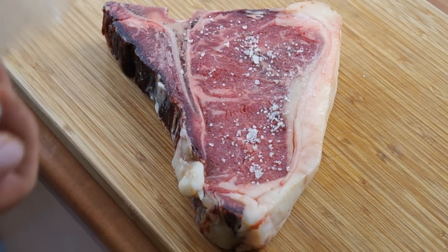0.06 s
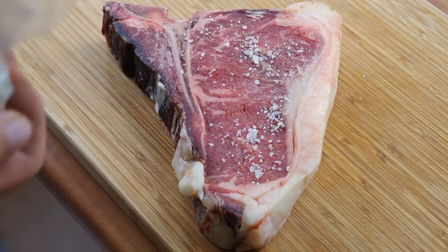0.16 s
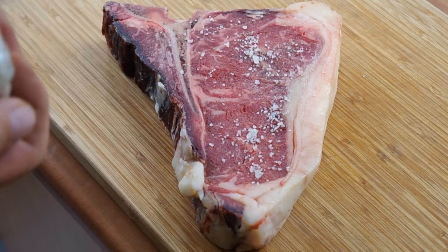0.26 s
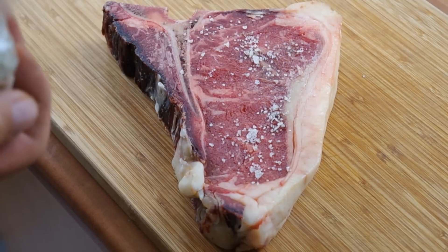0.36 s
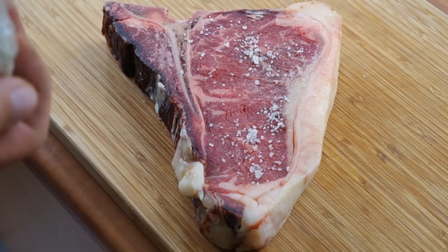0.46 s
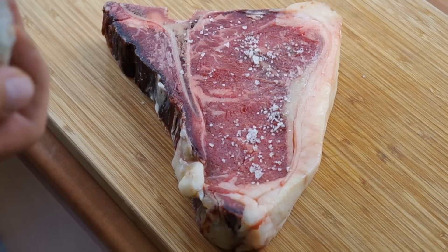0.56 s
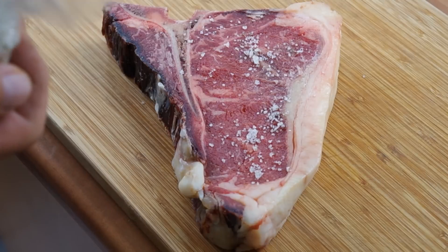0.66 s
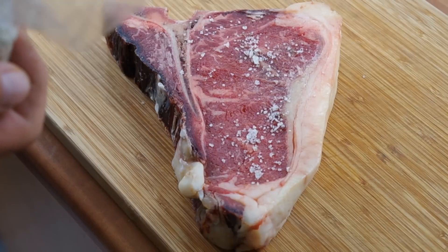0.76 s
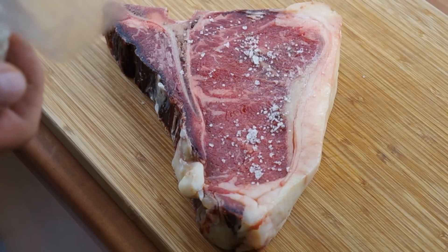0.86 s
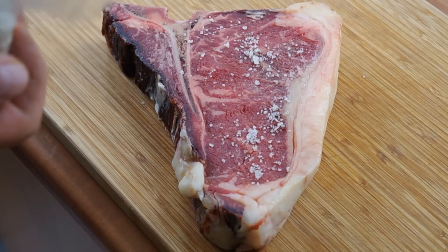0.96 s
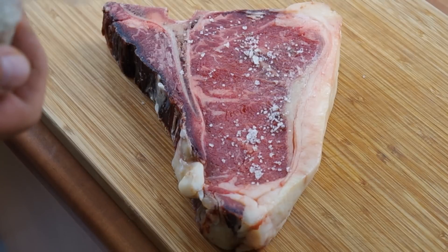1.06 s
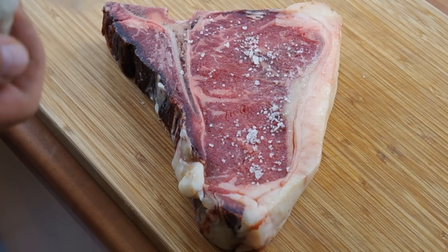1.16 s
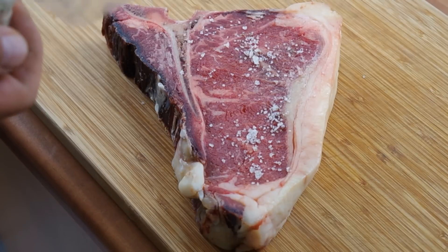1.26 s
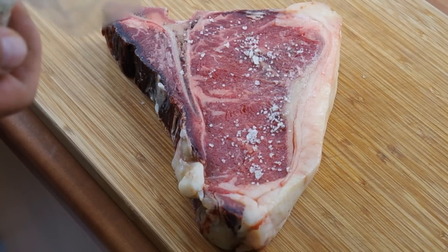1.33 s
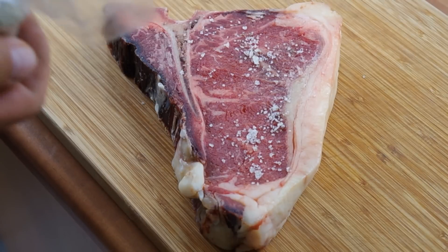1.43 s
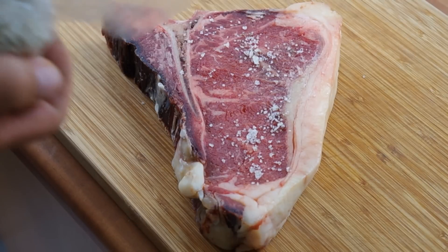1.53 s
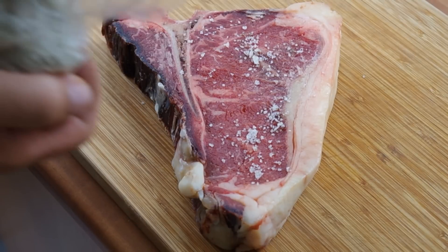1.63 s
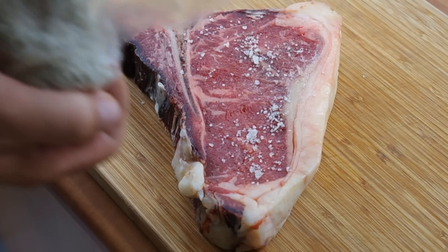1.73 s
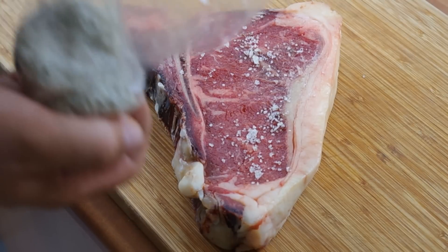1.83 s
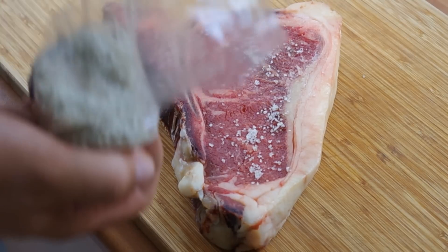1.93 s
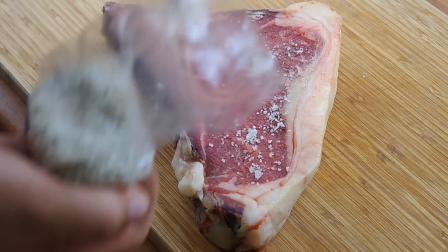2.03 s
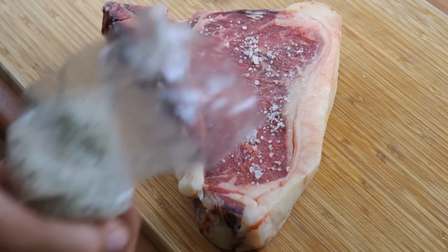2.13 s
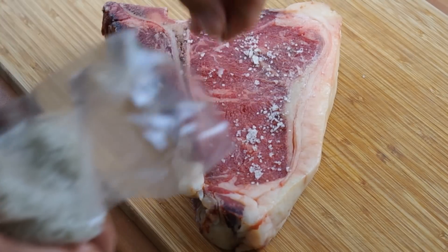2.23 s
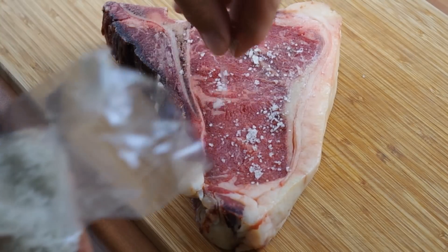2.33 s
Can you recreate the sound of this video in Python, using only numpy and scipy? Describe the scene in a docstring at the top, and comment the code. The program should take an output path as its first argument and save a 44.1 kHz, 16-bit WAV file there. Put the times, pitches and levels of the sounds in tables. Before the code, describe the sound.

A thin plastic bag of coarse salt is handled very close to the microphone: near silence, then bright snaps and crumples, densest before one second, then sparser crackles fading into faint hiss in a small live kitchen.

```python
"""A thin plastic bag of coarse salt is handled close by in a small, lively kitchen.
Creases snap as struck resonances; crumpling film, crackle and grinding crystals are filtered random clicks.
Flexing panels are decaying noise through resonances, and a shifting load is one filtered impulse.
Room echoes follow, over smooth filtered noise: a steady low rumble and a faint hiss of trickling salt
that swells in early, then holds nearly level."""
import sys
import numpy as np
from scipy import signal
from scipy.io import wavfile
from scipy.ndimage import uniform_filter1d

SR = 44100
rng = np.random.default_rng(int(sys.argv[2]) if len(sys.argv) > 2 else 0)


def output_pcm(signal):
    """Save a mono or channel-first signal as 16-bit PCM at the path in sys.argv[1].

    Samples are clipped to [-1, 1] before scaling.
    """
    pcm = np.clip(np.atleast_2d(signal).T, -1, 1) * 32767
    wavfile.write(sys.argv[1], SR, np.round(pcm).astype(np.int16))


N = 105840  # samples, 2.4 s


def snaps():
    """Impulse response: a crease's sudden release, a tick with a brief flutter, excites a broad resonance."""
    # Creases snapping through. Each row: start in seconds, rms level in dB before the common trim, pitch in Hz.
    snap_events = [(.1758, -30, 7400), (0.205, -41, 11000), (.2818, -17, 8500), (0.3106, -19, 7500),
                   (0.3235, -25, 11600), (0.3248, -16, 11600), (.357, -19.5, 9400), (.439, -30, 11700),
                   (.4705, -25, 11600), (0.5872, -24, 11500), (.5926, -23, 11400), (.611, -9.5, 11200),
                   (0.6122, -16, 7150), (0.686, -19, 11400), (0.7407, -15.5, 10200), (0.8102, -18, 12000),
                   (.829, -8.5, 11200), (0.831, -17, 12100), (0.8343, -10.5, 12000), (.866, -10, 11000),
                   (0.8814, -10.5, 8150), (0.8803, -15.5, 12200), (1.0675, -14, 12200),
                   (1.1365, -18.5, 11800), (1.1546, -19.5, 8400), (1.228, -28, 12000), (1.241, -12, 10300),
                   (1.2453, -17, 12000), (1.3272, -23, 10800), (1.3655, -24.5, 11300), (1.3985, -16, 11500),
                   (1.402, -16.5, 11500), (1.4925, -26, 12400), (1.5195, -23, 12300),
                   (1.5966, -19.5, 13300), (1.6303, -17.5, 8300), (1.761, -12, 12600), (1.7938, -29, 10100),
                   (1.8175, -25, 10600), (2.1605, -27, 10900)]
    # Spectrum shared by all snaps. Each row: frequency in Hz, relative gain in dB.
    snap_spectrum = [(100, -15), (700, 9.5), (5000, 4), (14500, 1), (16000, -1)]
    width_hz, flutter_s, flutter_db, trim_db = 3140, .0007, -9.5, -14.5
    out = np.zeros(N)
    t = np.arange(512) / SR
    noises = rng.standard_normal((len(snap_events), len(t)))
    for (start, db, hz), noise in zip(snap_events, noises):
        tick = t == 0
        flutter = amp(flutter_db) * noise * np.exp(-t / flutter_s)
        resonance = ring(tick + flutter, hz, width_hz)
        add(out, start, amp(db) * unit(colour(resonance, snap_spectrum)))
    return amp(trim_db) * out


def crumples():
    """Shot noise: dense tiny folds, whose bursts add in power, swell and die away exponentially."""
    # Bursts of folding film. Each row: peak time, rise time and fall time in seconds, peak level in dB.
    bursts = [(0.323, 0.0028, 0.022, -24), (0.614, 0.0045, 0.01, -19.5), (0.742, 0.0065, 0.0052, -21),
              (.772, 0.013, 0.0057, -27), (.832, 0.0056, 0.079, -35.5), (0.872, 0.0072, 0.022, -26.5),
              (1.066, 0.0043, 0.014, -35), (1.154, 0.023, 0.015, -33), (1.407, 0.0046, 0.017, -36),
              (1.498, 0.003, 0.022, -34.5), (1.636, 0.013, 0.0071, -32.5), (1.799, 0.004, 0.019, -29.5),
              (1.895, 0.016, 0.031, -33), (2.162, .002, 0.02, -41), (1.942, 0.011, 0.015, -24.5)]
    # Spectrum of the folds. Each row: frequency in Hz, relative gain in dB.
    fold_spectrum = [(100, -23), (400, -14.5), (1000, -14.5), (2000, -8), (5000, -6), (11500, 2),
                     (14500, 0.5), (16000, -34)]
    t = np.arange(N) / SR
    power = np.zeros(N)
    for peak, rise, fall, db in bursts:
        decay = np.maximum((peak - t) / rise, (t - peak) / fall)
        power += (amp(db) * np.exp(-decay)) ** 2
    folds = grains(per_s=9000, spread_db=4.0)
    return np.sqrt(power) * unit(colour(folds, fold_spectrum))


def crackle():
    """Modulated shot noise: fine ticks of film and crystals come in clumps of varying spectrum."""
    # Strength of the crackle. Each row: time in seconds, rms level in dB.
    crackle_level = [(0, -59.5), (.1, -66), (.165, -62), (.19, -40), (.36, -41.5), (.47, -45.5),
                     (.57, -57.5), (.64, -34.5), (.88, -35.5), (1.03, -45), (1.1, -39.5), (1.21, -54),
                     (1.26, -34), (1.37, -50), (1.42, -44.5), (1.58, -49.5), (1.66, -40.5), (2.03, -54.5),
                     (2.4, -57.5)]
    # Spectrum of the ticks. Each row: frequency in Hz, relative gain in dB.
    tick_spectrum = [(200, -33), (1500, -13), (3500, -4.5), (7000, -1.5), (11800, 4), (14500, -2.5),
                     (16000, -33)]
    clump_db, patch_db = 1, 2  # rms variation over time, and over time and frequency
    drift = uniform_filter1d(rng.standard_normal(N), size=200)  # 4.5 ms average
    clumps = amp(clump_db * unit(drift))
    ticks = patchy(clumps * grains(per_s=5000, spread_db=5.5), patch_db, size=20)
    return level(crackle_level) * unit(colour(ticks, tick_spectrum))


def grind():
    """Friction as many small slips: crystals rub together, muffled by the fingers."""
    # Strength of the grinding. Each row: time in seconds, rms level in dB.
    grind_level = [(0, -49), (.06, -94), (.17, -58.5), (.195, -42.5), (.42, -44), (.55, -47.5),
                   (.62, -38.5), (.69, -43.5), (.78, -39.5), (.94, -50), (1.05, -48.5), (1.1, -45.5),
                   (1.2, -51.5), (1.55, -52.5), (1.61, -44.5), (1.87, -54.5), (1.94, -45.5), (2.02, -63)]
    # Muffled spectrum of the slips. Each row: frequency in Hz, relative gain in dB.
    slip_spectrum = [(80, -12.5), (170, -9.5), (280, -4.5), (400, -3.5), (570, 1.5), (760, -3.5),
                     (2100, -2), (3000, -5.5), (16000, -14.5)]
    slips = grains(per_s=4000, spread_db=3.0)
    return level(grind_level) * unit(colour(slips, slip_spectrum))


def flexes():
    """Resonance of buckling panels: decaying noise through two peaks at one pitch sounds short and hollow."""
    # Buckling panels. Each row: start in seconds, onset level in dB, pitch in Hz, width of first peak in Hz.
    buckles = [(.19, -40, 296, 119), (.196, -40.5, 1310, 170), (.326, -33, 1800, 1000),
               (.564, -41, 1330, 70), (.607, -41, 380, 500), (.765, -35.5, 880, 596),
               (.768, -35.5, 2180, 900), (.828, -36.5, 1440, 700), (.876, -39, 600, 203),
               (1.595, -43, 1700, 1290), (1.631, -36, 3440, 890), (1.63, -35, 7940, 900),
               (1.668, -38.5, 1540, 900), (1.751, -39, 3160, 2000), (1.939, -36.5, 1000, 1200),
               (2.085, -50, 850, 220), (2.086, -54, 2580, 400), (2.157, -41.5, 4980, 1200)]
    decay_s = 0.014
    out = np.zeros(N)
    t = np.arange(SR // 5) / SR
    fade = np.exp(-t / decay_s)
    fade_rms = np.sqrt(np.mean(fade ** 2))
    noises = rng.standard_normal((len(buckles), len(t)))
    for (start, db, hz, width), noise in zip(buckles, noises):
        narrow = ring(noise * fade, hz, width)
        hollow = ring(narrow, hz, 2 * width)
        add(out, start, amp(db) * fade_rms * unit(hollow))
    return out


def thud():
    """Impulse response of a damped load: the salt shifts in the bag with one broad, dull knock."""
    # Spectrum of the knock. Each row: frequency in Hz, relative gain in dB.
    knock_spectrum = [(100, -25), (280, -5), (620, 1), (850, -24.5), (8000, -63)]
    start_s, rms_db = .866, -39.5
    out = np.zeros(N)
    knock = colour(signal.unit_impulse(1024), knock_spectrum)
    add(out, start_s, amp(rms_db) * unit(knock))
    return out


def kitchen(x):
    """Reverberation by convolution: early reflections from board and hands, then a decaying room tail."""
    # Reverberation time of the room. Each row: frequency in Hz, time to fall 60 dB in seconds.
    room_t60 = [(300, 0.18), (3000, 0.36), (12000, 0.28)]
    room_db, early_db, early_s, onset_s = -5, -10.5, 0.0049, 0.00094  # levels are of each echo's energy
    turn_hz = 2  # the echo pattern cycles twice a second
    t = np.arange(SR // 2) / SR
    out = x
    for k, (a, b) in enumerate(rng.standard_normal((4, 2, len(t)))):
        hz, at, z = signal.stft(a * abs(a), SR)  # a few strong reflections among many weak ones
        decay = amp(-60 * at / read(room_t60, hz)[:, None])
        tail = signal.istft(z * decay, SR)[1][:len(t)]
        tail = tail * (1 - np.exp(-t / onset_s))
        early = b ** 3 * t * np.exp(-2 * t / early_s)
        echo = amp(room_db) * tail / np.linalg.norm(tail)
        echo = echo + amp(early_db) * early / np.linalg.norm(early)
        # the four echo patterns take over from one another in a quarter-cycle rotation
        share = np.maximum(np.cos(2 * np.pi * turn_hz * np.arange(N) / SR + k * np.pi / 2), 0)
        out = out + signal.fftconvolve(x * share, echo)[:N]
    return out


def background():
    """Smooth filtered noise: a steady low rumble and a faint salt hiss that swells in, then holds nearly level."""
    # Spectrum of the room rumble. Each row: frequency in Hz, relative gain in dB.
    rumble_spectrum = [(25, 1), (80, -1.5), (110, -14), (200, -10.5), (1200, -16), (3000, -29.5)]
    # Strength of the fine salt's trickle. Each row: time in seconds, rms level in dB.
    trickle_level = [(.15, -82), (.4, -57), (2.4, -55)]
    # Spectrum of the trickle. Each row: frequency in Hz, relative gain in dB.
    trickle_spectrum = [(150, -15.5), (700, -1), (1800, -13.5), (7000, -7), (11500, 0), (16000, -7)]
    rumble_db = -57
    rumble, hiss = rng.standard_normal((2, N))
    rumble = amp(rumble_db) * unit(colour(rumble, rumble_spectrum))
    trickle = level(trickle_level) * unit(colour(hiss, trickle_spectrum))
    return rumble + trickle


def grains(per_s, spread_db):
    """Poisson-like shot noise: random tiny clicks of either sign, a few much larger than the rest."""
    size = amp(spread_db * np.minimum(rng.exponential(1, N), 4))
    sign = rng.choice([-1, 1], N)
    return size * sign * (rng.random(N) < per_s / SR)


def patchy(x, depth_db, size):
    """Time-frequency modulation: a smoothed random gain field gives passing grains varying spectra."""
    z = signal.stft(x, nperseg=256)[2]
    field = uniform_filter1d(rng.standard_normal(z.shape), size, axis=0)  # across frequency
    field = uniform_filter1d(field, size=4, axis=1)  # across time
    return signal.istft(z * amp(depth_db * unit(field)), nperseg=256)[1][:N]


def ring(x, hz, width_hz):
    """Second-order resonance: quality factor is pitch over bandwidth."""
    b, a = signal.iirpeak(min(hz, SR / 2 - 1), hz / width_hz, SR)
    return signal.lfilter(b, a, x)


def colour(x, points, size=4096):
    """Minimum-phase filtering: the Hilbert transform of log gain gives the phase of a causal filter."""
    hz = abs(np.fft.fftfreq(size, 1 / SR))
    log_gain = np.log(amp(read(points, hz)))
    taps = np.fft.ifft(np.exp(np.conj(signal.hilbert(log_gain)))).real
    return signal.fftconvolve(x, taps[:size // 2])[:len(x)]


def read(points, hz):
    """Interpolates a table along a logarithmic frequency axis."""
    f, value = np.transpose(points)
    return np.interp(np.log(hz + 1), np.log(f + 1), value)


def level(points):
    """Amplitude envelope: gain over time from a curve linear in dB."""
    return amp(np.interp(np.arange(N) / SR, *np.transpose(points)))


def amp(db):
    """Decibels to amplitude ratio."""
    return 10 ** (np.asarray(db) / 20)


def unit(x):
    """Power normalisation: scales to rms 1."""
    return x / np.sqrt(np.mean(x ** 2) + 1e-20)


def add(mix, start_s, sound):
    """Superposition: adds a sound to the mix at its start time."""
    part = mix[max(round(start_s * SR), 0):][:len(sound)]
    part += sound[:len(part)]


def scene():
    """Superposition: the bag's sounds share the kitchen's echoes, and the background is added dry."""
    bag = snaps() + crumples() + crackle() + grind() + flexes() + thud()
    return (kitchen(bag) + background())[None]


def record(dry):
    """Saturation, then band limiting: the input rounds off the sharpest peaks before a low-pass filter."""
    ceiling, edge_hz = .65, 15900  # ceiling as a fraction of full scale
    soft = ceiling * np.tanh(dry / ceiling)
    low_pass = signal.firwin(255, edge_hz, window=("kaiser", 9), fs=SR)
    return signal.oaconvolve(soft, low_pass[None], "same")


dry = scene()
out = record(dry)
output_pcm(out)
```